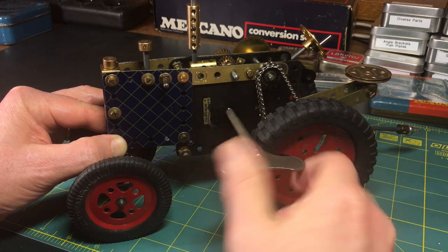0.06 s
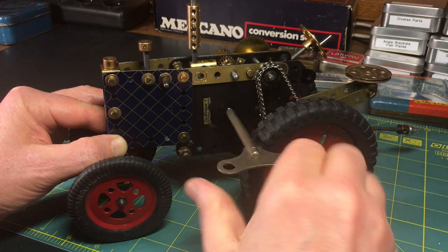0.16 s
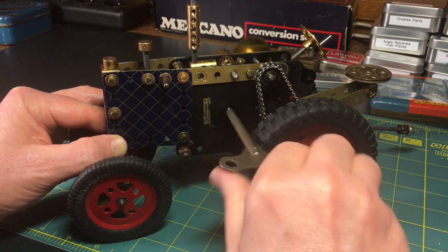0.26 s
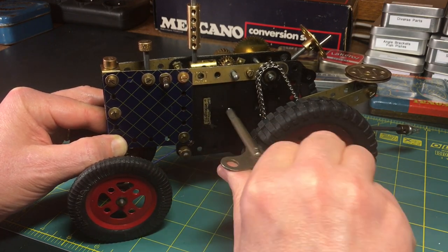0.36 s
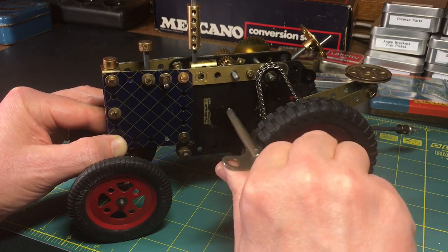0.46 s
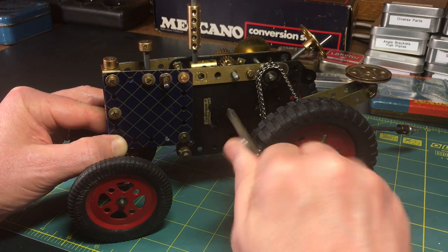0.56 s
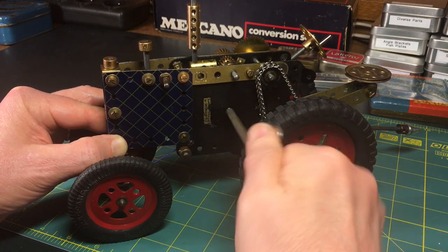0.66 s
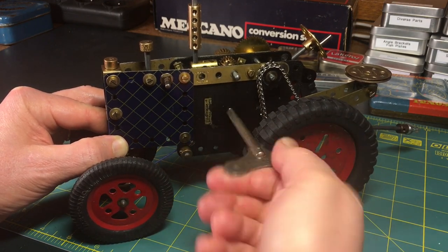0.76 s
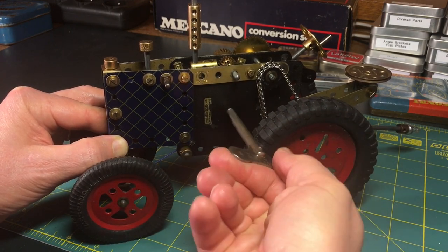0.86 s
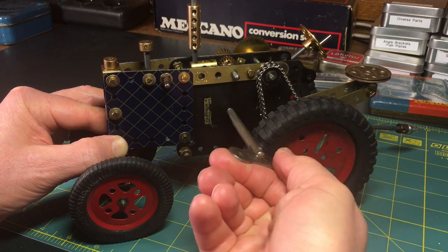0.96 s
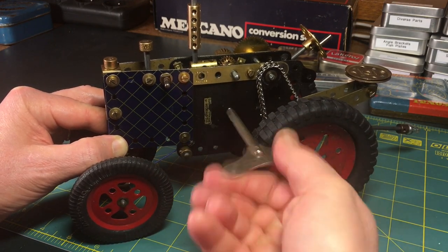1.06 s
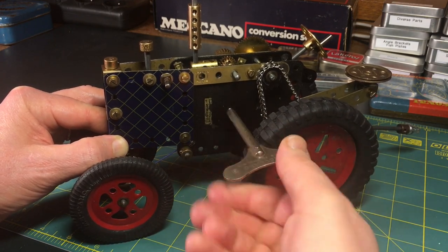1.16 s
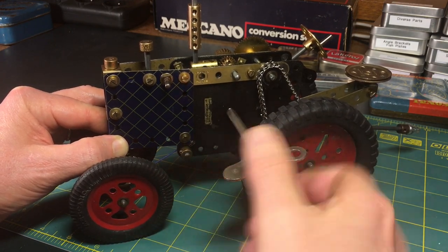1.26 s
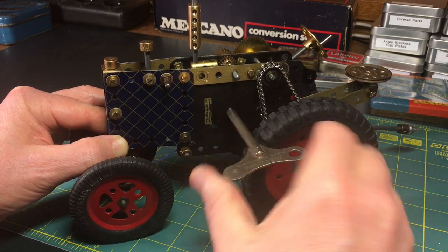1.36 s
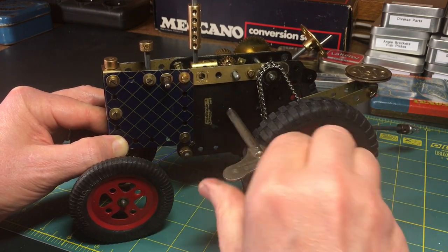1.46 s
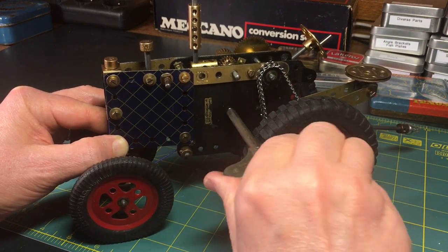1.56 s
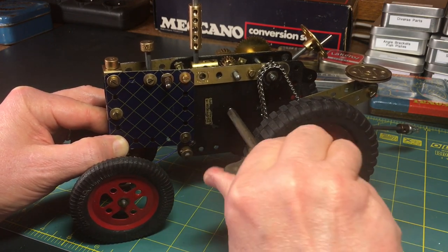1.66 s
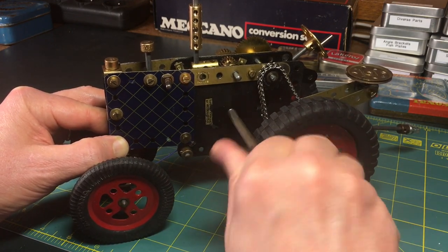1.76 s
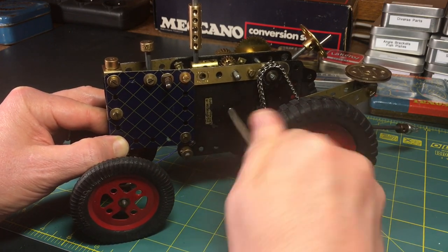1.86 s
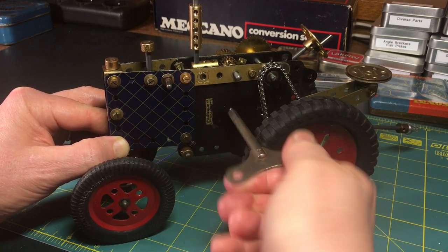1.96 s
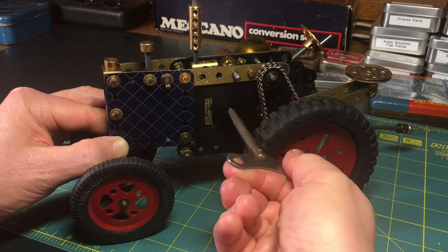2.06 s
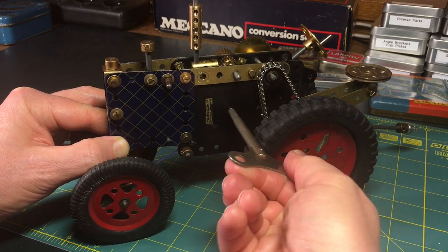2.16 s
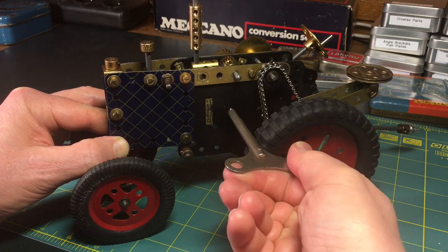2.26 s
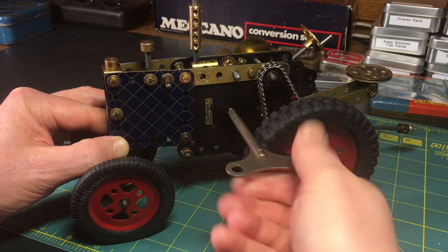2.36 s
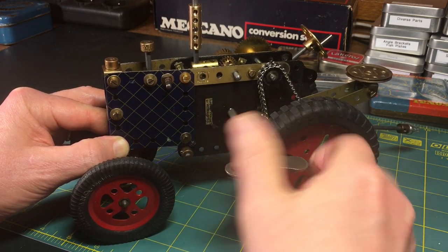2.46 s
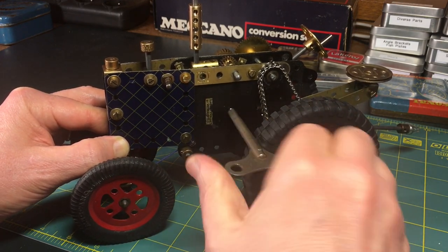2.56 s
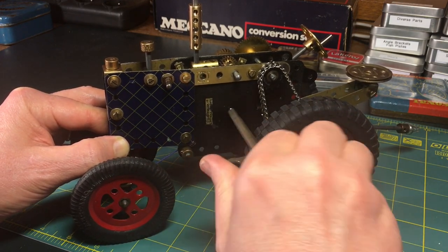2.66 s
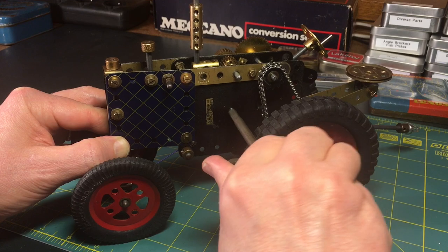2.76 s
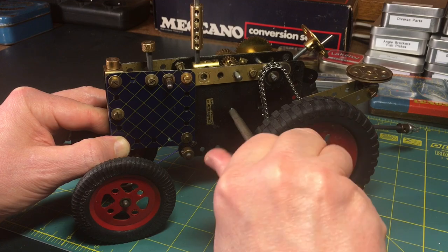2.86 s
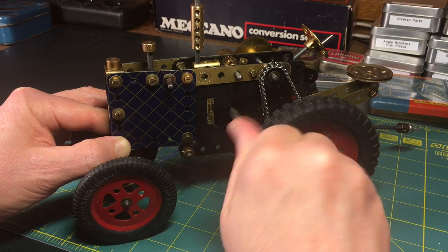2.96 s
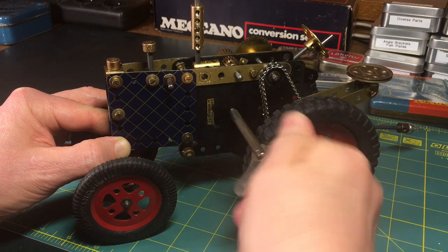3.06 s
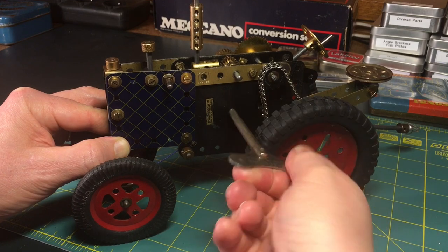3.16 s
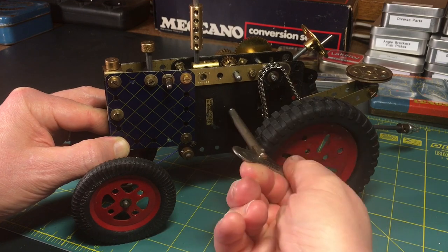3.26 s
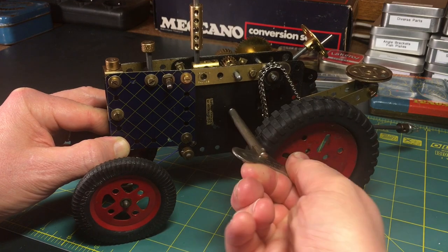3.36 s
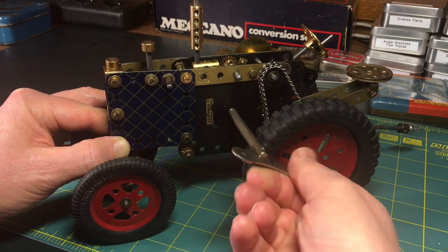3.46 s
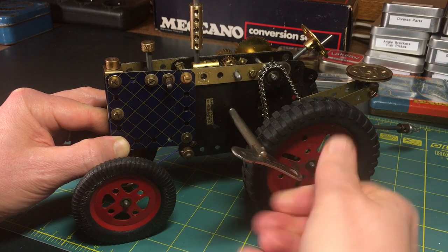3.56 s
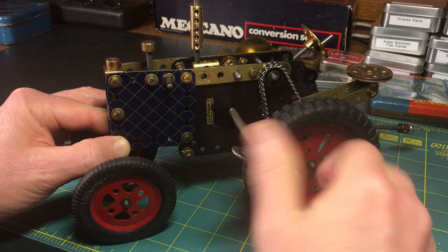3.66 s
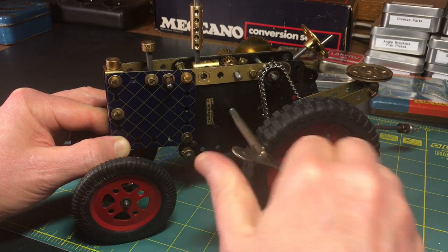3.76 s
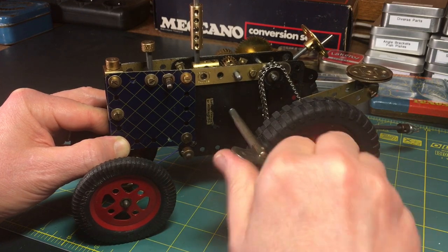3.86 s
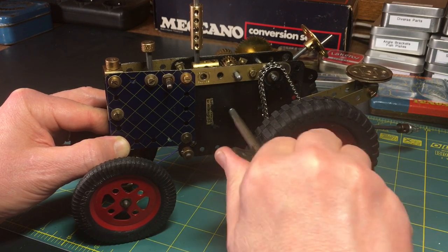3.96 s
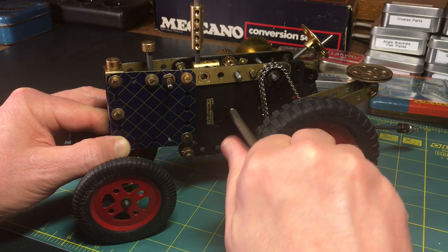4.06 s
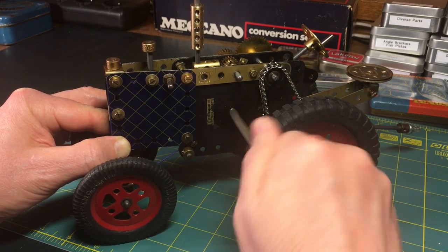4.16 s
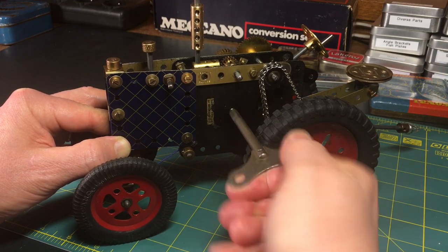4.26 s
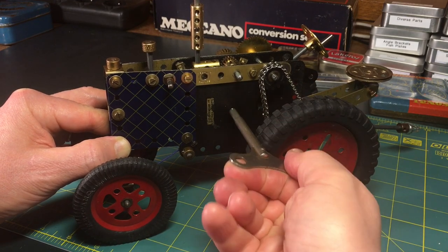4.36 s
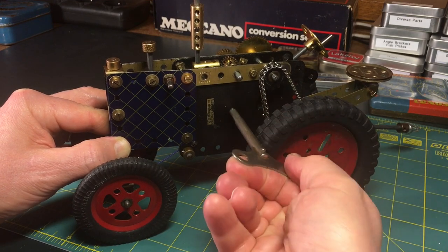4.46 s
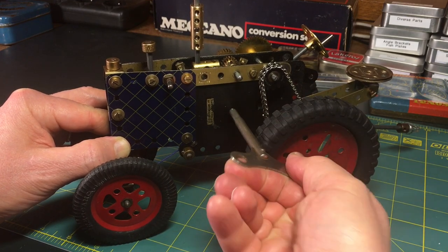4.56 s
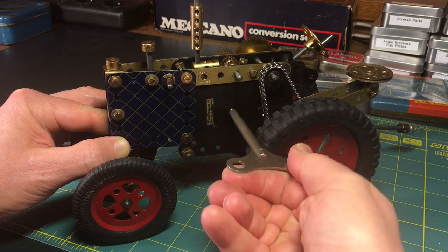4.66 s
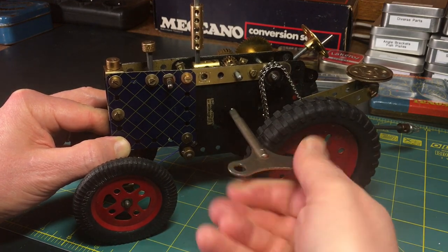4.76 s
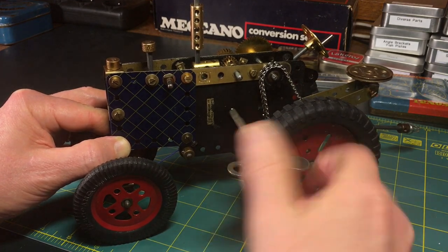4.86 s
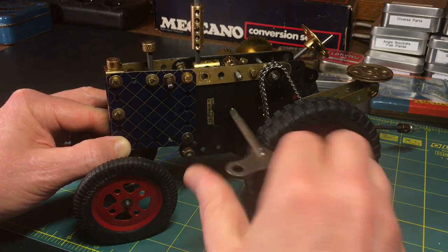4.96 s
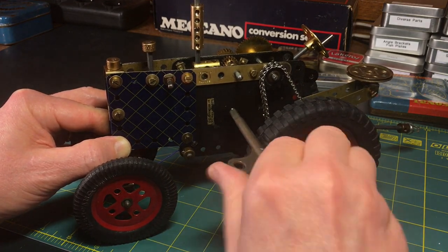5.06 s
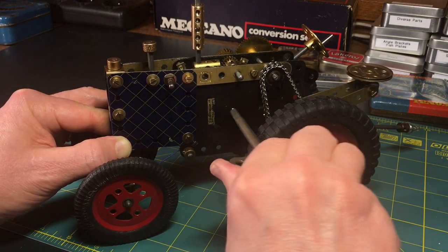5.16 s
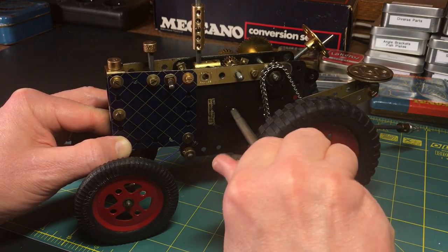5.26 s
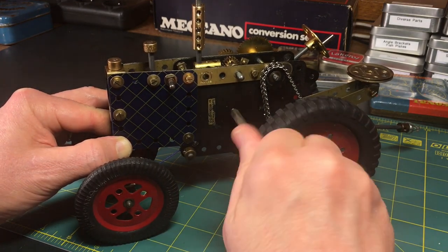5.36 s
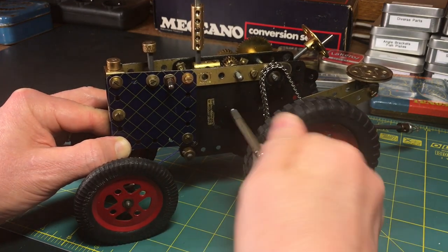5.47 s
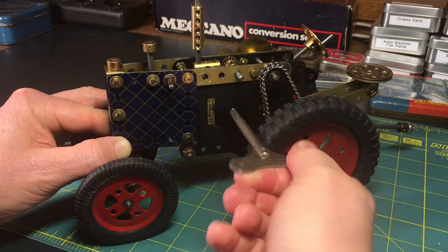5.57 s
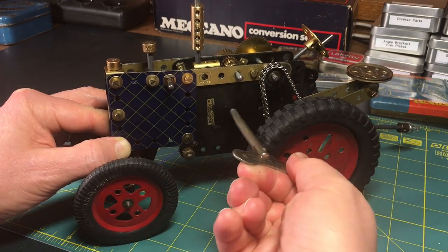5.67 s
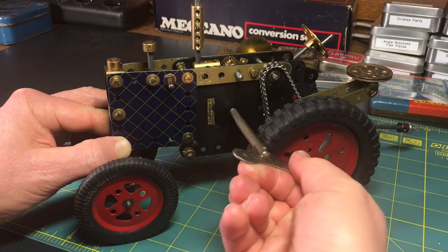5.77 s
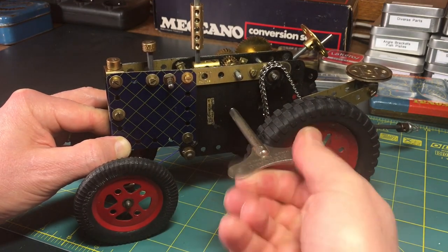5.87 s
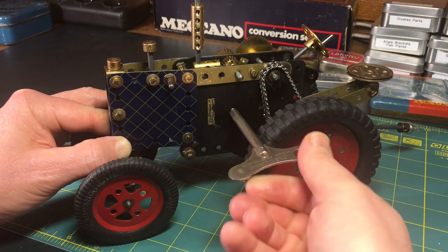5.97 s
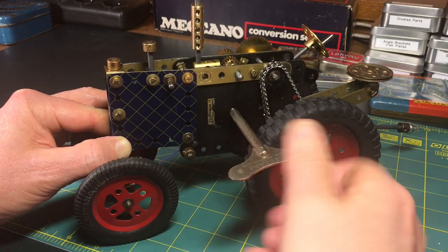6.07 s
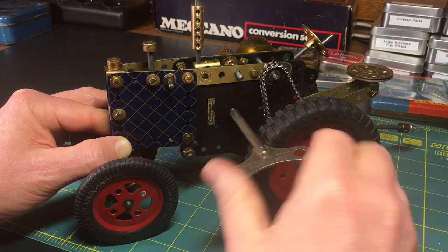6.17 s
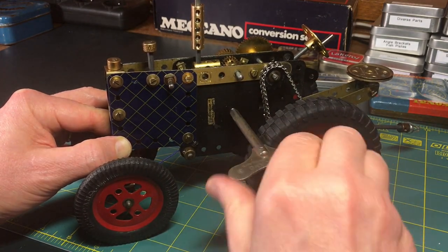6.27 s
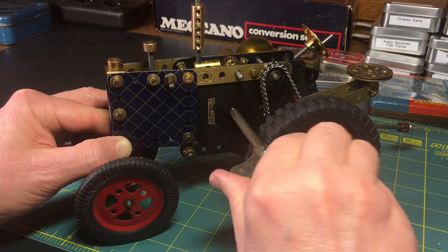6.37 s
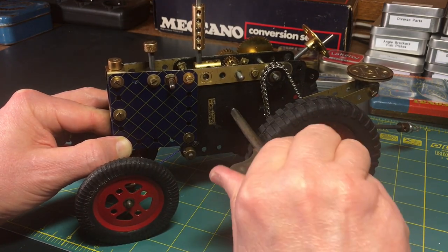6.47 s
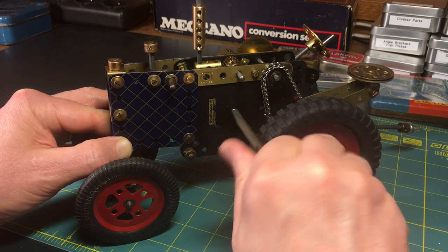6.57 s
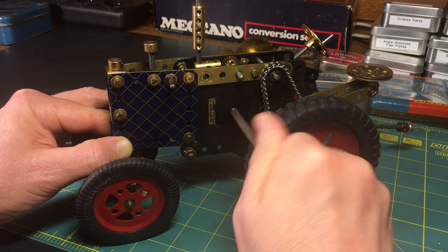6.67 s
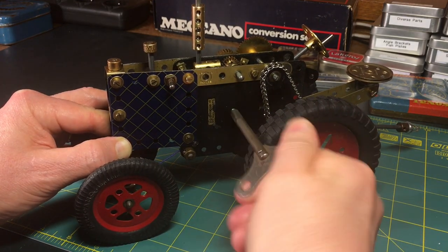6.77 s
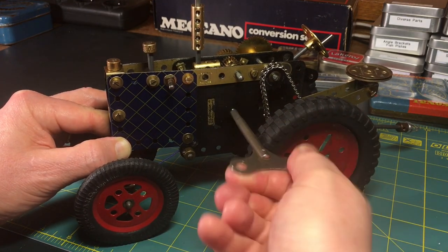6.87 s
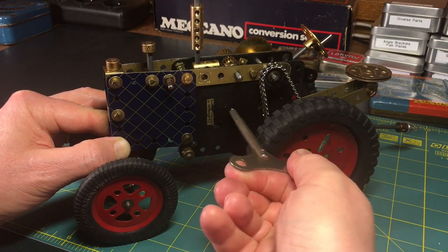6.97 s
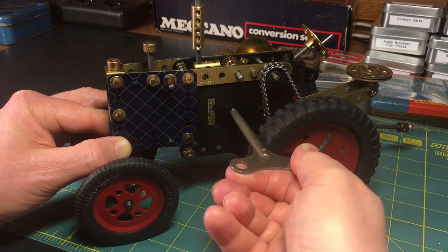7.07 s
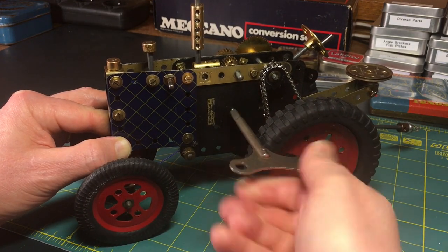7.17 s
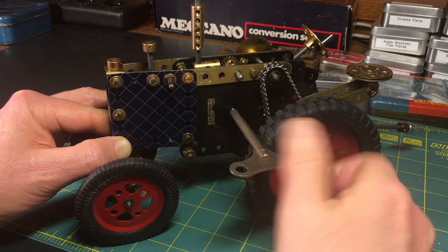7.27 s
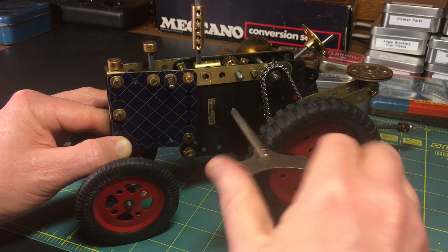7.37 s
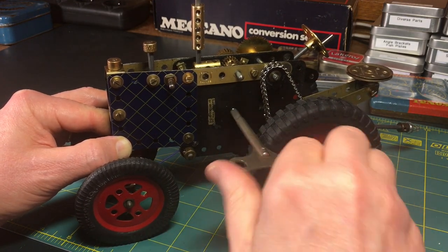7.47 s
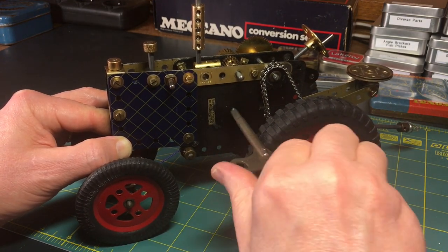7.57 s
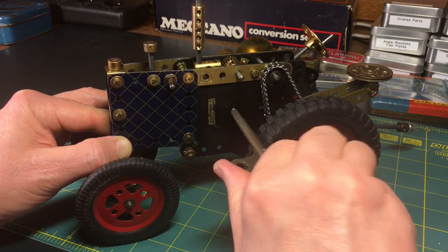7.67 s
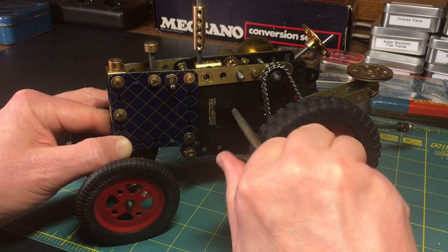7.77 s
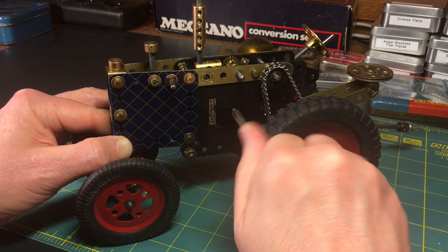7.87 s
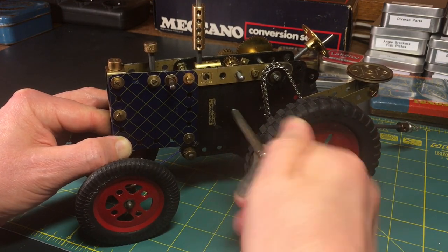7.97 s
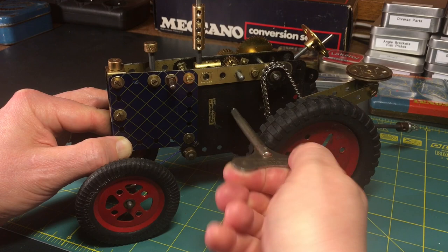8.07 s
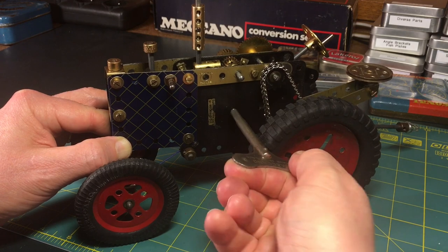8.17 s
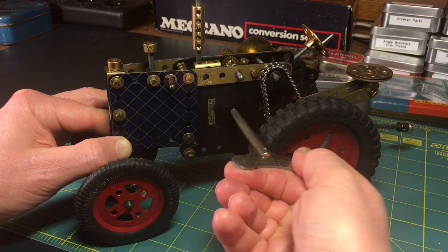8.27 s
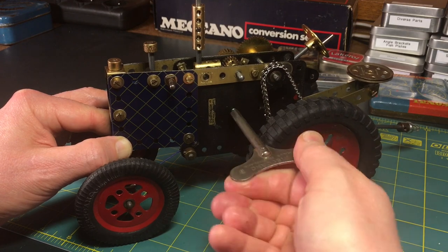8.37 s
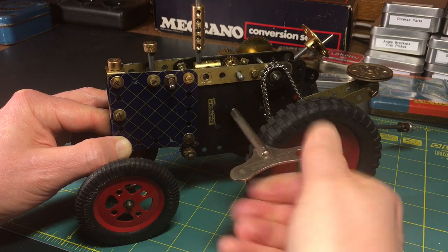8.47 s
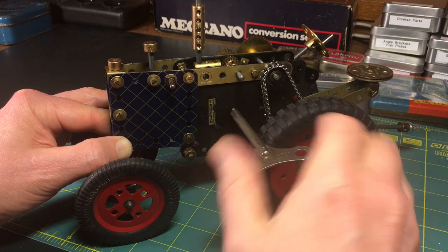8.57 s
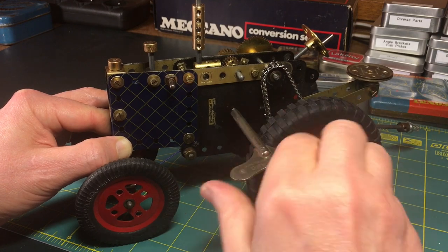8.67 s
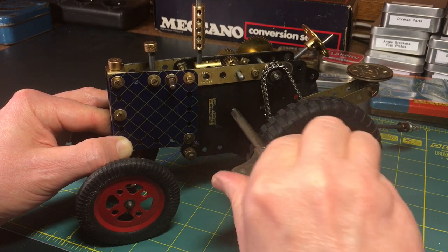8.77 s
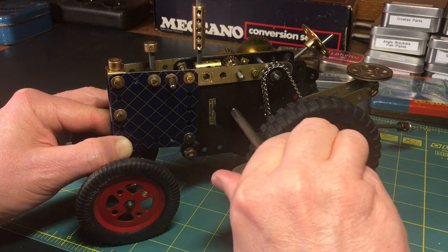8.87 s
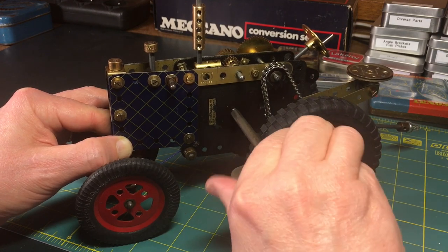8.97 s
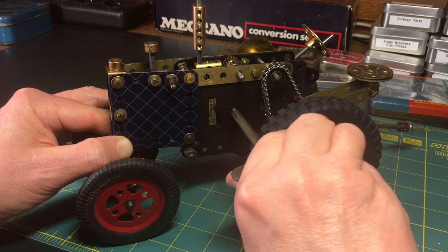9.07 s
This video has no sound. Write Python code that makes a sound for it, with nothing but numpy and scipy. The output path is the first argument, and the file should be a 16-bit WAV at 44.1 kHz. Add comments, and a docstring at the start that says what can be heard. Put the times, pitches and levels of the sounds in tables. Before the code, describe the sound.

Close up in a small, quiet room, a hand winds the clockwork motor of a metal toy car on a table. Faint air and low shudder open, with small fumbling knocks and a brighter clink near 0.5 s. Ratchet bursts follow at about 0.6, 1.8, 3.0, 4.2, 5.4, 6.6 and 7.9 s, each four or five hard, bright clicks within a quarter second, with buzzing loose metal, low table rumble and a soft hiss swelling and fading. Between bursts the key shifts and drops back with light clacks and a very high, thin ring. Stronger metallic knocks with table thumps land around 1.1, 2.3, 4.65, 5.9 and 8.4 s. Barely audible thin whistles bend past near 1.5 and 5.1 s. After 8.4 s it quiets to faint handling ticks near 9 s. The room reflection is short and slight.

```python
"""A faint bed of air, low table shudder and soft hiss comes first, then small knocks: a hand is winding
the clockwork motor of a metal toy car on a table, close to the microphone. Each turn of the key takes up
its slack with a knock, the pawl snaps over four or five ratchet teeth, and the key drops back and rings.
Contacts are noise bursts driving resonances; the hand's force is shaped noise that shakes the table top.
Two thin whistles bend past, and a small room answers the motor."""
import sys
import numpy as np
from scipy import signal
from scipy.io import wavfile

SR = 44100
rng = np.random.default_rng(int(sys.argv[2]) if len(sys.argv) > 2 else 0)


def put_to_file(sound):
    """Save the sound as 16-bit audio at rate SR, in the file named by the first command-line argument."""
    columns = np.atleast_2d(sound).T  # one column per channel
    safe = np.clip(columns, -1, 1)
    whole_steps = np.round(safe * 32767)
    wavfile.write(sys.argv[1], SR, whole_steps.astype(np.int16))


N = 401751


def gain_of(db):
    """Amplitude factor of a level in dB."""
    return 10 ** (np.asarray(db) / 20)


def evened(x):
    """The sound scaled to an RMS of 1."""
    return x / np.sqrt(np.mean(x ** 2) + 1e-20)


def read(points, at):
    """A curve drawn by points, read with straight lines between them."""
    x, value = np.transpose(points)
    return np.interp(at, x, value)


def high_pass(x, hz):
    """Fourth-order Butterworth filter that drops what lies below hz."""
    return signal.sosfilt(signal.butter(4, hz, "high", fs=SR, output="sos"), x)


def colour(x, points):
    """Minimum-phase filter from a spectrum drawn on a log-frequency axis, with energy 1."""
    hz = abs(np.fft.fftfreq(8192, 1 / SR))
    log_points = [(np.log(f), db) for f, db in points]
    level_db = np.maximum(read(log_points, np.log(hz + 1)), -100)
    log_gain = np.log(gain_of(level_db))
    # the Hilbert transform of the log gain gives the phase that makes the filter causal
    taps = np.fft.ifft(np.exp(np.conj(signal.hilbert(log_gain)))).real[:4096]
    return signal.oaconvolve(x, taps / np.linalg.norm(taps))[:len(x)]


def body(modes, seconds):
    """Answer to a click, energy 1: decaying sines, the wider the resonance the shorter its ring."""
    t = np.arange(round(seconds * SR)) / SR
    ring = np.zeros(len(t))
    for hz, width, db in modes:
        decay = np.sqrt(width) * np.exp(-np.pi * width * t)
        ring += gain_of(db) * decay * np.sin(2 * np.pi * hz * t)
    return ring / np.linalg.norm(ring)


def struck(s, db, sound):
    """The sound started at each time with each level."""
    train = np.zeros(N)
    np.add.at(train, np.round(np.asarray(s) * SR).astype(int), gain_of(db))
    return signal.oaconvolve(train, sound)[:N]


def swells(start, end, db, rise, fall):
    """Summed gains that climb to each level, hold from start to end, and sink, in dB per second."""
    t = np.arange(0, N / SR + .002, .001)[:, None]
    climb = rise * np.maximum(start - t, 0)
    sink = fall * np.maximum(t - end, 0)
    gain = gain_of(db - climb - sink).sum(axis=1)
    return np.interp(np.arange(N) / SR, t[:, 0], gain)


# Spectrum of the background air. Each row: frequency in Hz, relative level in dB per Hz.
AIR_SPECTRUM = [(15, -30), (25, 5), (120, -13), (236, -7.5), (624, -19.5), (988, -17.5), (1650, -23.5),
                (2350, -17), (5000, -40), (9320, -26), (10400, -32), (13200, -18.5), (16000, -29)]
AIR_DB = -74.5  # RMS


def air():
    """Steady background air: noise through a fixed spectrum."""
    return gain_of(AIR_DB) * evened(colour(rng.standard_normal(N), AIR_SPECTRUM))


# The hands resting on car and key. Each row: time in seconds, table top level in dB, hiss level in dB.
RESTING = [(0.0, -59, -69.5), (0.42, -64, -77), (0.5, -56, -74.5), (1.25, -63, -74), (1.42, -68, -75),
           (1.62, -67, -73), (2.35, -56, -82), (2.57, -67, -77), (2.66, -62.5, -82.5), (3.43, -60, -73.5),
           (3.68, -72.5, -73.5), (3.93, -67.5, -79.5), (4.05, -61, -80.5), (4.76, -55.5, -75),
           (4.98, -71, -74), (5.08, -56, -76), (6.08, -61, -74.5), (6.3, -76, -78), (6.45, -55, -82),
           (7.3, -61.5, -75), (7.45, -78.5, -79), (7.56, -60, -78), (8.5, -58, -75.5), (8.66, -70.5, -80.5),
           (9.11, -61, -79.5)]
# The hand jolts the car and the table top shudders. Each row: time in seconds, table top level in dB.
JOLTS = [(0.05, -56), (0.153, -46.5), (0.329, -55), (1.04, -47), (1.149, -28.5), (1.669, -52.5),
         (2.28, -38), (2.639, -54.5), (3.32, -43.5), (4.029, -50.5), (4.339, -47), (4.668, -37),
         (5.048, -44), (5.732, -42), (5.955, -30), (6.37, -60), (6.799, -50.5), (7.28, -62.5),
         (7.512, -46.5), (7.81, -47.5), (8.3, -57.5), (8.401, -34)]
# A turn of the key under full load. Each row: start in seconds, end in seconds, table top level in dB,
# hiss level in dB.
TURNS = [(0.651, 0.856, -45, -56.5), (1.818, 2.023, -43.5, -52.5), (2.97, 3.213, -43, -56.5),
         (4.18, 4.391, -49, -59.5), (5.397, 5.626, -43, -57.5), (6.629, 6.902, -48, -54.5),
         (7.918, 8.088, -43, -54)]
# Table top resonances. Each row: frequency in Hz, width in Hz, relative level in dB.
TABLE_TOP = [(50, 11, -17.5), (86.7, 22, 11.5), (112.45, 3.5, 11.5), (188, 17, -29.5)]
# Chassis resonances. Each row: frequency in Hz, width in Hz, relative level in dB.
CHASSIS = [(255, 120, -2.5), (383, 300, -10), (600, 230, -8), (830, 48, -2.5)]
# Spectrum of the soft bright hiss. Each row: frequency in Hz, relative level in dB per Hz.
HISS_SPECTRUM = [(710, -44), (1200, -12.5), (2060, 0), (2480, -13.5), (3180, 1.5), (7170, -2.5),
                 (9930, -0.5), (16000, -1.5)]
LOAD_RISE, LOAD_FALL = 270, 300  # dB per s
JOLT_RISE, JOLT_FALL, JOLT_CREAK_FALL = 820, 400, 1800  # dB per s
HISS_LAG_S, HISS_HOLD_S = .04, .06  # after full load starts; time at full level
HISS_RISE, HISS_FALL = 200, 140  # dB per s
TURN_CREAK_DB, JOLT_CREAK_DB, REST_CREAK_DB = -20, -16, -15  # chassis creak against the table top
SLIPS_PER_S, SLIP_SAMPLES = 380, 85  # average rate of the creak's slips; length of each push
SLIP_SPREAD_DB = 2.5  # average extra level: a few slips are much larger


def hand():
    """Uneven force rings the table top and creaks the chassis; a soft bright hiss swells in each turn."""
    start, end, load_db, turn_hiss_db = np.transpose(TURNS)
    jolt_s, jolt_db = np.transpose(JOLTS)
    rest_s, rest_db, rest_hiss_db = np.transpose(RESTING)
    t = np.arange(N) / SR
    rest = gain_of(np.interp(t, rest_s, rest_db))
    rest_hiss = gain_of(np.interp(t, rest_s, rest_hiss_db))

    turning = swells(start, end, load_db, LOAD_RISE, LOAD_FALL)
    table_gain = rest + turning + swells(jolt_s, jolt_s, jolt_db, JOLT_RISE, JOLT_FALL)
    creak_gain = gain_of(REST_CREAK_DB) * rest + gain_of(TURN_CREAK_DB) * turning
    creak_gain += swells(jolt_s, jolt_s, jolt_db + JOLT_CREAK_DB, JOLT_RISE, JOLT_CREAK_FALL)
    hiss_start = start + HISS_LAG_S  # full after the first clicks of a turn, then it fades
    hiss_gain = rest_hiss + swells(hiss_start, hiss_start + HISS_HOLD_S, turn_hiss_db, HISS_RISE, HISS_FALL)

    shake = evened(signal.oaconvolve(rng.standard_normal(N), body(TABLE_TOP, .25))[:N])
    slips = rng.standard_normal(N) * (rng.random(N) < SLIPS_PER_S / SR)
    slips *= gain_of(SLIP_SPREAD_DB * rng.exponential(1, N))
    creak_answer = np.convolve(body(CHASSIS, .06), np.hanning(SLIP_SAMPLES))
    creak = evened(signal.oaconvolve(slips, creak_answer)[:N])
    hiss = evened(colour(rng.standard_normal(N), HISS_SPECTRUM))
    return table_gain * shake + creak_gain * creak + hiss_gain * hiss


# The key rings when the fingers leave it free. Each row: start in seconds, top mode level in dB,
# lower modes in dB against the top mode, top mode t60 in seconds.
KEY_RINGS = [(0, -69, -3, 0.28), (0.498, -38.5, -1, 0.23), (1.031, -56.5, 5.5, 0.49),
             (1.694, -48.5, 2.5, 0.26), (2.243, -41, -17, .25), (2.278, -42.5, -14, 0.32),
             (2.878, -43, -1.5, 0.19), (3.39, -57, -2, 0.31), (4.069, -47.5, -4.5, 0.32),
             (4.613, -43, -4.5, 0.24), (4.665, -38.5, -18, 0.36), (5.286, -45.5, -5.5, 0.21),
             (5.818, -50, -15, 0.18), (6.5, -43, -26, 0.27), (7.082, -64, 5, 0.28), (7.784, -46, -18, 0.26),
             (8.299, -48.5, -8, 0.33)]
# Lower modes of the key. Each row: frequency in Hz, further level in dB, t60 as a share of the top mode's.
KEY_LOWER_MODES = [ (12828, 2, .55), (11036, -16, .4), (3928, -12, .5), (2790, -16, .6)]
KEY_TOP_HZ = 13797


def key():
    """Thin, high, slowly dying modes of the steel key."""
    out, t = np.zeros(N + SR), np.arange(SR // 2) / SR
    for s, top_db, lower_db, top_t60 in KEY_RINGS:
        modes = [(KEY_TOP_HZ, top_db, top_t60)]
        modes += [(hz, top_db + lower_db + db, top_t60 * share) for hz, db, share in KEY_LOWER_MODES]
        ring = sum(gain_of(db - 60 * t / t60) * np.sin(2 * np.pi * hz * t) for hz, db, t60 in modes)
        out[round(s * SR):][:len(t)] += ring * np.tanh(t / 0.0018)  # soft onset
    return out[:N]


# Spectrum of the bright snap. Each row: frequency in Hz, relative level in dB per Hz.
SNAP_SPECTRUM = [(4120, -33), (7000, -13), (7480, -15), (8910, -1), (9600, 1), (10800, -2.5), (12400, 5),
                 (13700, -5.5), (14900, 7), (16100, -9.5), (17000, -39.5)]
# Spectrum of the gear train. Each row: frequency in Hz, relative level in dB per Hz.
GEAR_SPECTRUM = [(1940, -29), (3300, -3.5), (3590, -7), (3960, -2.5), (4200, 1), (4730, -4.5), (5460, 2.5),
                 (6010, -2), (6870, -1), (7350, -6), (8000, -5.5), (10400, -22.5), (17600, -120)]
SMALL_HZ = 1906  # small parts radiate little below this


def rattle(rows, shapes, frame, free_width, free_db):
    """Bursts of tiny contacts drive the bright snap, the gear train and the frame."""
    snap_drive, gear_drive, plates = np.zeros(N + 4000), np.zeros(N + 4000), np.zeros(N + 12000)
    bursts = shapes * rng.standard_normal(shapes.shape) * gain_of(2 * rng.standard_normal(shapes.shape))
    # each burst keeps the energy of its shape
    bursts *= (np.linalg.norm(shapes, axis=1) / np.linalg.norm(bursts, axis=1))[:, None]
    for (s, db, plates_db, gears_db, free_hz), burst in zip(rows, bursts):
        at = round(s * SR)
        snap_drive[at:at + len(burst)] += gain_of(db) * burst
        gear_drive[at:at + len(burst)] += gain_of(db + gears_db) * burst
        free_plate = (free_hz, free_width, free_db)  # the grip decides which plate is free
        ring = signal.oaconvolve(burst, body(frame + [free_plate], .15))
        late = at + round(0.001202 * SR)  # the blow travels through the frame first
        plates[late:late + len(ring)] += gain_of(db + plates_db) * ring
    sound = colour(snap_drive[:N], SNAP_SPECTRUM) + colour(gear_drive[:N], GEAR_SPECTRUM) + plates[:N]
    return high_pass(sound, SMALL_HZ) + gain_of(-16.0) * sound


# Key and fingers against the shaft. Each row: start in seconds, tick drive in dB, side plates in dB above
# the tick, free plate in Hz, table thump peak in dB, chassis knock peak in dB.
KNOCKS = [(0.1221, -62, 11, 2300, -41.5, -59), (0.1415, -57.5, 13, 2180, -62, -47),
          (0.2675, -71.5, 13, 2350, -67.5, -80), (0.386, -39, -2, 2260, -57.5, -49),
          (0.4628, -69, 19.5, 2230, -40, -74), (0.492, -26.5, -4, 2410, -44.5, -64),
          (0.861, -38, -2, 2090, -45, -67.5), (1.0157, -49.5, 6.5, 2130, -72, -59),
          (1.0236, -32, -6.5, 2150, -64, -80.5), (1.1221, -20, 1.5, 2330, -44, -48),
          (1.6873, -26.5, -1.5, 2720, -35, -68.5), (2.23, -44, 10, 2630, -59, -77),
          (2.2364, -28.5, -52, 2235, -52, -71), (2.2656, -40, -8, 2170, -58, -53),
          (2.2703, -23.5, 1.5, 2580, -36, -49), (2.3898, -66, 19.5, 2390, -74, -73),
          (2.62, -70, 3, 2344, -50, -75.5), (2.6787, -69.5, 5, 2340, -61.5, -75),
          (2.871, -27, -1.5, 2730, -38, -48), (3.3815, -34.5, -1.5, 2390, -50.5, -59),
          (3.6214, -58.5, -3, 1904, -79, -68), (3.997, -79, 21.5, 2380, -68.5, -76),
          (4.0625, -25.5, -5, 2740, -48, -61), (4.5294, -58, 7.5, 2100, -57, -65),
          (4.595, -42, -1, 2120, -37, -63), (4.6105, -28, -3.5, 2470, -60, -55),
          (4.6546, -19.5, 1.5, 2220, -36, -42), (5.0148, -52.5, 7, 2016, -58, -55),
          (5.035, -68.5, 24, 2710, -58, -47), (5.0487, -73, 21.5, 2480, -62, -55),
          (5.1065, -68.5, 20.5, 2350, -45.5, -75.5), (5.188, -68, 8, 2260, -44, -58),
          (5.2742, -32, 3.5, 2670, -62, -74), (5.278, -27.5, -9.5, 2760, -40.5, -60),
          (5.711, -50.5, 4.5, 2130, -53, -53), (5.7872, -62.5, 14, 3030, -52, -79),
          (5.8023, -45.5, 5, 2580, -63, -66), (5.8142, -34, -10, 2780, -39, -75),
          (5.9265, -18.5, 0, 2270, -37.5, -37.5), (6.039, -54, 11, 2170, -51, -54.5),
          (6.492, -28.5, 0, 2690, -56, -64), (7.061, -38, 3.5, 2420, -70, -51),
          (7.077, -36.5, -10, 2365, -70, -52), (7.486, -66, 11, 2400, -62.5, -69.5),
          (7.5094, -69.5, 11, 2436, -93, -78), (7.7767, -27, -1, 2720, -44.5, -57),
          (8.294, -30.5, -2.5, 2790, -58.5, -75), (8.3796, -19.5, 5, 2440, -63.5, -34.5),
          (8.974, -78, 14, 2740, -59, -77.5), (8.9978, -75, 15, 2735, -50, -68),
          (9.029, -81, 11, 2670, -67, -82)]
# Side plate resonances. Each row: frequency in Hz, width in Hz, relative level in dB.
PLATES = [(2040, 83, -16), (2120, 72, -6.5), (2080, 57, -5), (2416, 67, 4.5), (2650, 300, 2.5),
          (3220, 110, -0.5)]
# Loose strips that ring on after a knock. Each row: frequency in Hz, width in Hz, relative level in dB.
BRACKETS = [(2175, 30, -12.5), (2360, 26, -7.5), (3930, 45, -12)]
FREE_PLATE_DB = 10
KNOCK_MS = 3.7  # time scale of the swell; its peak comes at half of this
KNOCK_GEARS_DB = -5.5  # gear train against the tick, before the plates' share
GEARS_WITH_PLATES = 0.13  # dB the gears gain per dB of plates above the tick


def knocks():
    """Softer contacts that swell and die, and thump the chassis and the table."""
    ms = np.arange(2000) * 1000 / SR
    u = ms / KNOCK_MS
    swell = 1.453 * u ** .8 * np.exp(-1.6 * u)
    chatter = 0.18 * np.exp(-ms / 13.0) * np.tanh(u)
    ticks = []
    for s, db, plates_db, free_hz, _, _ in KNOCKS:
        gears_db = KNOCK_GEARS_DB + GEARS_WITH_PLATES * max(plates_db, 0)
        ticks.append((s, db, plates_db, gears_db, free_hz))
    shapes = np.tile(swell + chatter, (len(ticks), 1))
    contact = rattle(np.array(ticks), shapes, PLATES + BRACKETS, 210.0, FREE_PLATE_DB)

    # soft pushes, a few samples long, against table and chassis
    thump = signal.oaconvolve(body(TABLE_TOP, .25), signal.windows.hann(90))
    knock = signal.oaconvolve(body(CHASSIS, .06), signal.windows.hann(24))
    s, thump_db, knock_db = np.array(KNOCKS)[:, [0, 4, 5]].T
    return (contact + struck(s + 0.0068, thump_db, thump / abs(thump).max())
            + struck(s + 0.0022, knock_db, knock / abs(knock).max()))


# Pawl over a tooth. Each row: start in seconds, relative drive of the snap in dB, frame in dB against the
# snap, free plate in Hz, bounce as a share of the snap, bounce peak in ms after the start.
PAWL = [(0.613, -5.5, -10.5, 2090, 0.24, 5.1), (0.6861, -7.5, -11.5, 2500, 0.5, 5),
        (0.7526, -7, -14.5, 2780, 0.34, 0.97), (0.8029, -8, -8.5, 2010, 0.4, 3.2),
        (1.8146, -7.5, -10, 2230, 0.25, 5.8), (1.8825, -5.5, -12, 2000, 0.27, 4.9),
        (1.942, -9, -12.5, 2070, 0.55, 4.5), (1.9948, -9.5, -15, 2050, 0.6, 3.4),
        (2.0554, -5, -12, 2180, 0.15, 3.3), (2.9881, -6.5, -12.5, 2030, 0.38, 5.2),
        (3.0591, -7.5, -14, 2230, 0.68, 4), (3.1144, -9, -14.5, 2070, 0.85, 1.9),
        (3.1649, -10, -8.5, 2030, 0.51, 4.2), (3.302, -8.5, -11, 2200, 0.37, 4.6),
        (4.1777, -7, -11.5, 2250, 0.27, 5.4), (4.2554, -6.5, -10.5, 2050, 0.27, 5.4),
        (4.31, -6.5, -17, 2060, 0.29, 3.8), (4.375, -13, -14, 2150, 1, 2.54),
        (5.3989, -7.5, -12, 1880, 0.45, 4.8), (5.4726, -5.5, -12.5, 2020, 0.3, 4.6),
        (5.5381, -6, -12.5, 2000, 0.25, 4.6), (5.5923, -9, -8, 2000, 0.26, 4.4),
        (6.6217, -7.5, -10, 2140, 0.27, 5.3), (6.6978, -9, -10, 2030, 0.37, 5),
        (6.771, -5.5, -12.5, 2320, 0.19, 3.5), (6.8464, -12.5, -14, 2030, 1, 2.76),
        (6.9339, -9, -14.5, 2150, 0.6, 4.6), (7.895, -9.5, -11.5, 1880, 0.7, 3.8),
        (7.9725, -8, -13, 2340, 0.51, 5.8), (8.0293, -6, -15, 2110, 0.28, 5.2),
        (8.085, -7.5, -12, 1950, 0.2, 5.1)]
# Small ticks shortly before a tooth's snap or a knock. Each row: start in seconds, drive in dB.
SMALL_TICKS = [(0.589, -54), (3.285, -34.5), (4.161, -36), (5.378, -54.5), (6.599, -49), (7.883, -45.5),
               (8.281, -45)]
# The ratchet wheel and its arbor. Each row: frequency in Hz, width in Hz, relative level in dB.
WHEEL = [(1780, 120, -4), (4350, 300, 0), (4850, 300, -3), (5450, 350, 3)]
PAWL_GEARS_DB = 2  # gear train above the frame level
TOOTH_PLATE_WIDTH, TOOTH_PLATE_DB = 260., 13.  # Hz, dB: a broad, short plate resonance under each tooth


def pawl():
    """A sharp snap onto the tooth, a bounce, and loose parts chattering until they settle."""
    rows, ms = np.array(PAWL), np.arange(2000) * 1000 / SR
    after_snap = ms - 1.2
    snap = np.exp(np.where(after_snap < 0, -(after_snap / 0.088) ** 2, -after_snap / 0.72))
    after_bounce = ms - rows[:, 5:6]
    bounce = np.exp(np.where(after_bounce < 0, -(after_bounce / 1.1) ** 2, -after_bounce / 3.4))
    settle = 0.22 * np.exp(-ms / 7.9) * np.tanh(ms)
    tooth_shapes = .5 * (snap + rows[:, 4:5] * bounce + settle)
    teeth = [(s, db, frame_db, frame_db + PAWL_GEARS_DB, hz) for s, db, frame_db, hz, _, _ in PAWL]
    ticks = [(s, db, 0., -4., 2400.) for s, db in SMALL_TICKS]
    tick_shapes = np.tile(snap, (len(ticks), 1))
    return (rattle(np.array(teeth), tooth_shapes, PLATES + WHEEL, TOOTH_PLATE_WIDTH, TOOTH_PLATE_DB)
            + rattle(np.array(ticks), tick_shapes, PLATES, 200., 3.))


SIZZLE_DB, SIZZLE_FALL = -42.5, 253  # dB against the pawl table's snap column; dB per s


def sizzle():
    """The wheel's loose fittings buzz on: dense noise in its resonances, dying after each tooth."""
    s, snap_db = np.array(PAWL)[:, :2].T
    t = np.arange(SR // 3) / SR
    envelope = struck(s, snap_db + SIZZLE_DB, gain_of(-SIZZLE_FALL * t) * np.tanh(t / .004))
    buzz = rng.standard_normal(N) * gain_of(2.7 * rng.standard_normal(N))
    return envelope * evened(signal.oaconvolve(buzz, body(WHEEL, .05))[:N])


# Faint thin whistles, one list for each. Each row: time in seconds, pitch in Hz, RMS level in dB.
WHISTLES = [
    [(1.49, 9600, -84), (1.54, 10140, -80), (1.6, 9730, -82), (1.64, 9990, -85)],
    [(5.12, 9585, -84), (5.15, 9850, -81), (5.195, 9560, -84)],
]


def whistles():
    """Short pure tones that bend a little."""
    out = np.zeros(N)
    for rows in WHISTLES:
        s, hz, db = np.transpose(rows)
        t = np.arange(s[0], s[-1], 1 / SR)
        phase = 2 * np.pi * np.cumsum(np.interp(t, s, hz)) / SR
        tone = np.sqrt(2) * gain_of(np.interp(t, s, db)) * np.sin(phase)
        out[round(s[0] * SR):][:len(t)] += tone * signal.windows.tukey(len(t), .2)
    return out


# How long the small room rings. Each row: frequency in Hz, t60 in seconds.
ROOM_T60 = [(1000, 0.16), (2500, 0.29), (6000, 0.31), (14000, 0.2)]


def room(x):
    """Sparse taps of random sign, each band dying at its own speed."""
    taps = np.zeros(SR // 2)
    at = np.arange(200, len(taps) - 20, 20)
    taps[at + rng.integers(0, 20, len(at))] = rng.choice([-1., 1.], len(at))
    hz, t, bands = signal.stft(taps, SR, nperseg=256)
    decay = gain_of(-60 * t / read(ROOM_T60, hz)[:, None])
    tail = signal.istft(bands * decay, SR, nperseg=256)[1]
    return signal.oaconvolve(x, tail / np.linalg.norm(tail))[:N]


def scene():
    """The motor with its room, the hand, the whistles and the air, in one channel."""
    motor = pawl() + sizzle() + knocks() + key()
    return (motor + gain_of(-18.0) * room(motor) + hand() + whistles() + air())[None]


RUMBLE_HZ, EDGE_HZ = 45, 16000  # low and high edges of the pickup


def record(dry):
    """The microphone drops the deepest bass; then the band limit."""
    band_limit = signal.firwin(63, EDGE_HZ, window=("kaiser", 9), fs=SR)
    return signal.oaconvolve(high_pass(dry, RUMBLE_HZ), band_limit[None], "same")


dry = scene()
out = record(dry)
put_to_file(out)
```